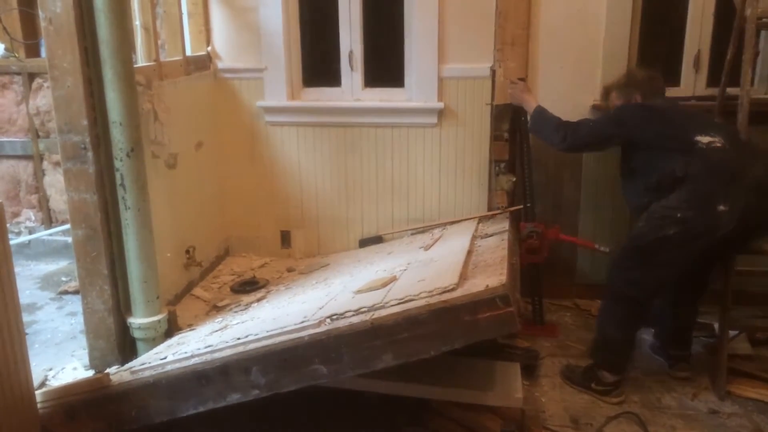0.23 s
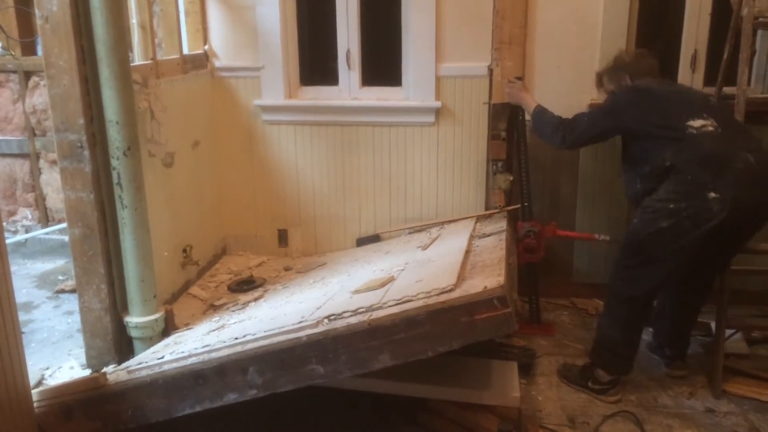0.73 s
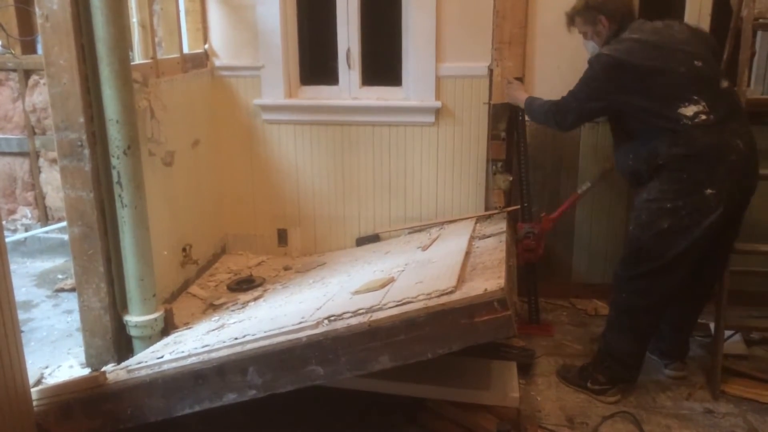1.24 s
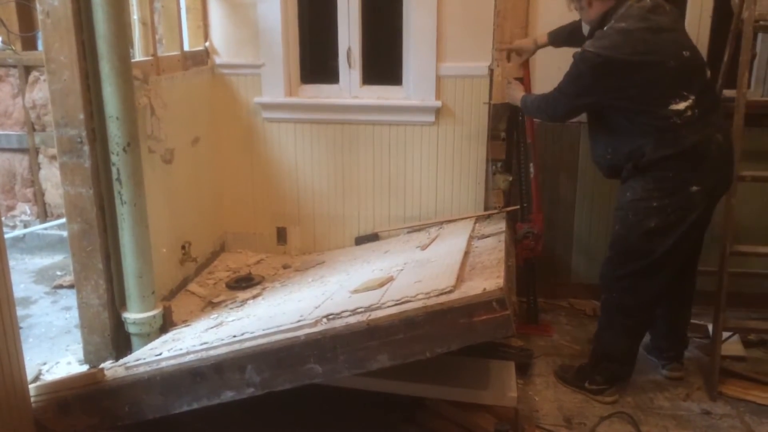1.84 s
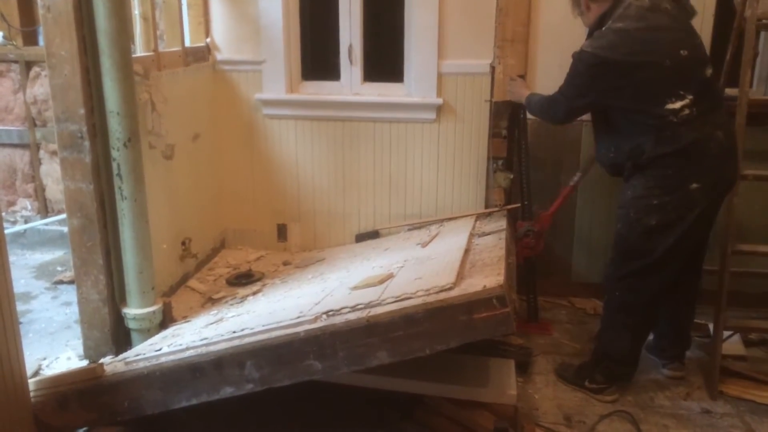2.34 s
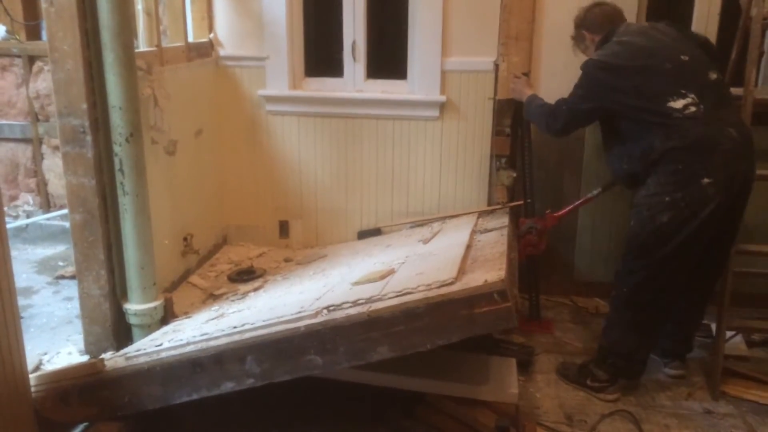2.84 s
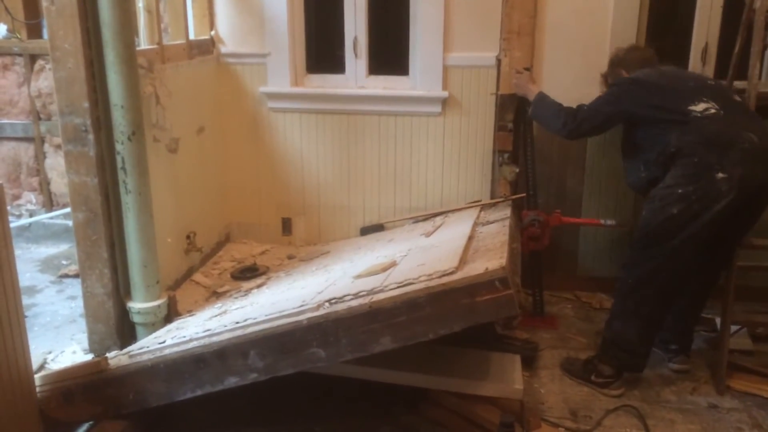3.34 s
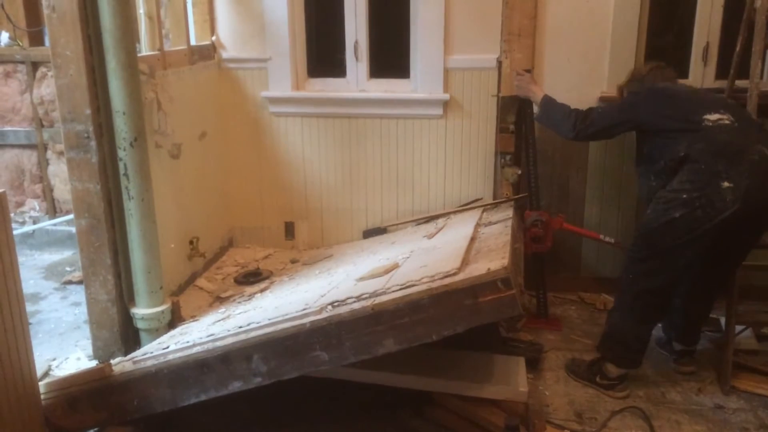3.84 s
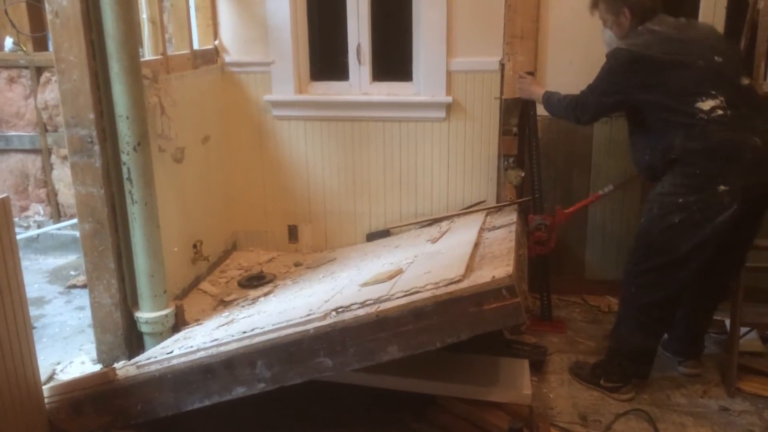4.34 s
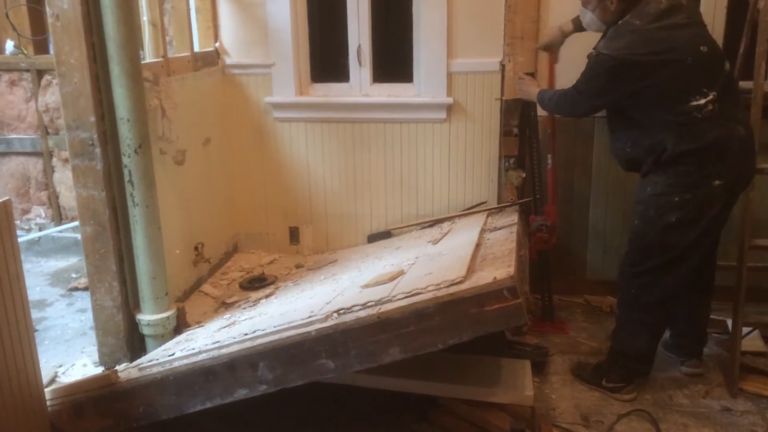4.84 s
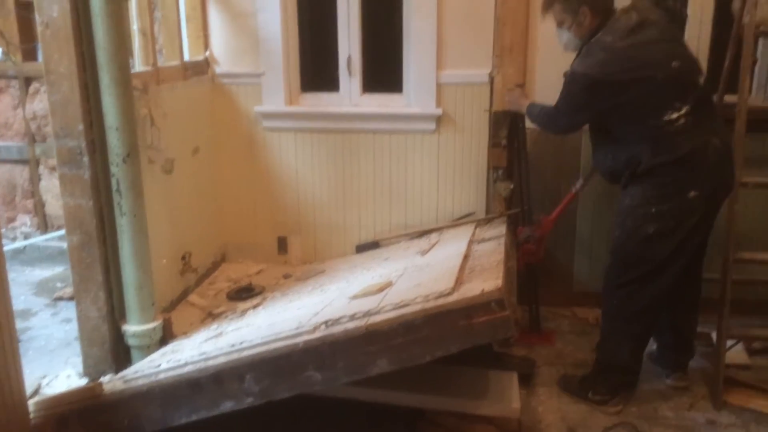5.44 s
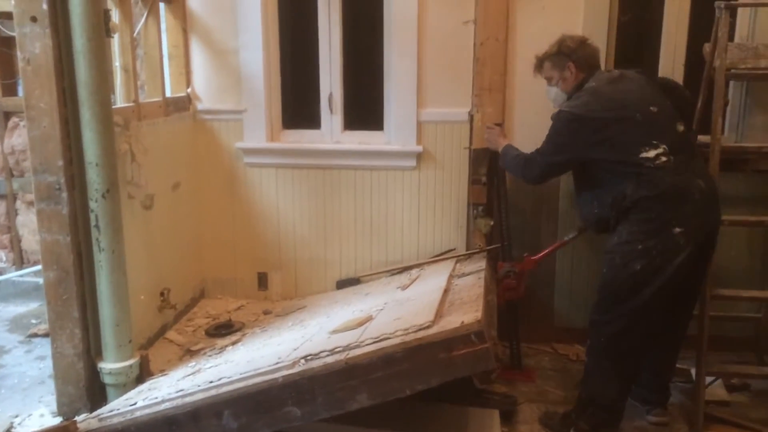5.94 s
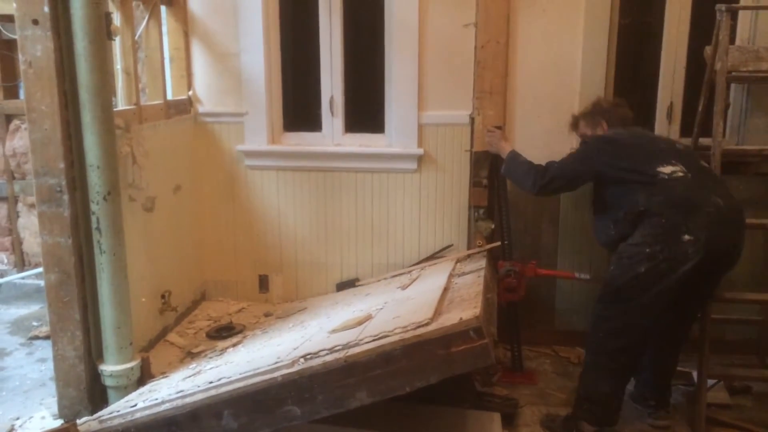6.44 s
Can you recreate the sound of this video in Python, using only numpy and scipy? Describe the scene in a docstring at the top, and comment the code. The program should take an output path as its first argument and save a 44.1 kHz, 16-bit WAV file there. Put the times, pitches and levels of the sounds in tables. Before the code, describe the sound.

Heavy timber creaks and cracks in three bursts as a hand jack lifts it, steel pins clinking and clanking between strokes.

```python
"""Loaded timber creaks and cracks as a farm jack levers up a heavy wooden floor section in a bare room. On each
down stroke the wood sticks and slips in runs of sharp cracks, which drive the modes of boards and joists so
that the whole floor booms. On each up stroke two steel climbing pins snap over, a clink and then a clank. Boots
shuffle in between, boards thump and the linkage ticks, over faint background noise."""
import sys
import numpy as np
from scipy import signal
from scipy.fft import rfft, irfft
from scipy.io import wavfile
from scipy.ndimage import uniform_filter1d

SR = 44100
rng = np.random.default_rng(int(sys.argv[2]) if len(sys.argv) > 2 else 0)


def put_to_file(sound):
    """Save the sound as 16-bit audio at rate SR, in the file named by the first command-line argument."""
    columns = np.atleast_2d(sound).T  # one column per channel
    safe = np.clip(columns, -1, 1)
    whole_steps = np.round(safe * 32767)
    wavfile.write(sys.argv[1], SR, whole_steps.astype(np.int16))


N = 294588
TIME = np.arange(N) / SR

# the light pin springs into its hole: start_s, level_db, rebound_delay_s, rebound_db
PIN_CLINKS = [(1.5523, -21.5, .010, 2), (4.742, -20, .010, -1)]
# heavy steps and settling timber flex one board each: start_s, level_db, pitch_hz, decay_s
BOARD_BLOWS = [(.348, -31.5, 338, 0.013), (.832, -39.5, 332, 0.014), (.922, -29, 242, .042),
               (.957, -25, 123.3, .034), (1.309, -40.5, 348, 0.03), (2.085, -42, 520, 0.017),
               (2.33, -40, 195, 0.041), (2.515, -41, 158, 0.024), (2.935, -25.5, 232.4, 0.04),
               (2.945, -28.5, 329, .039), (5.366, -40.5, 149, 0.018), (5.595, -50, 267, 0.014),
               (6.332, -24, 318, 0.0075)]


def amp(db):
    """Converts decibels to an amplitude ratio."""
    return 10 ** (np.asarray(db) / 20)


def unit_rms(x):
    """Normalises power to rms 1."""
    return x / np.sqrt(np.mean(x ** 2) + 1e-20)


def unit_blow(x):
    """Normalises energy to that of 10 ms at rms 1."""
    return x / np.sqrt(np.sum(x ** 2) / (SR / 100) + 1e-20)


def curve_at(points, hz):
    """Interpolates on a log-frequency axis."""
    freqs, values = np.transpose(points)
    return np.interp(np.log(hz + 1), np.log(freqs + 1), values)


def add(mix, start, sound):
    """Superposition: a sound joins the mix at its start time in seconds."""
    part = mix[max(round(start * SR), 0):][:len(sound)]
    part += sound[:len(part)]


def colour(x, spectrum, size=4096):
    """Minimum-phase filtering: a causal response with the given magnitude spectrum."""
    log_gain = np.log(amp(curve_at(spectrum, abs(np.fft.fftfreq(size, 1 / SR)))))
    taps = np.fft.ifft(np.exp(np.conj(signal.hilbert(log_gain)))).real
    return signal.oaconvolve(x, taps[:size // 2])[:len(x)]


def burst(spectrum, rise, decay, spread_db=4):
    """Contact noise: a swarm of tiny, uneven impacts builds up and dies away."""
    t = TIME[:int((8 * decay + .04) * SR)]
    noise, size = rng.standard_normal((2, len(t)))
    envelope = np.minimum(t / rise, 1) ** 2 * np.exp(-np.maximum(t - rise, 0) / decay)
    return unit_blow(colour(noise * amp(spread_db * size) * envelope, spectrum))


def clatter(modes, rise, decay):
    """Forced vibration: each damped resonance is a band of noise that follows the contact force."""
    t = TIME[:SR // 8]
    hz = np.fft.rfftfreq(len(t), 1 / SR)
    contact = np.minimum(t / rise, 1) * np.exp(-t / decay)
    out = 0
    for centre, width, db in modes:
        band = 1 / (1 + (2 * (hz - centre) / width) ** 4)
        shaken = irfft(rfft(rng.standard_normal(len(t))) * band, len(t))
        out = out + amp(db) * unit_blow(shaken * contact)
    return unit_blow(out)


def struck(modes):
    """Free vibration: after one kick each mode decays exponentially."""
    t = TIME[:SR // 2]
    ring = sum(amp(db - 60 * t / t60) * np.cos(2 * np.pi * hz * t) for hz, db, t60 in modes)
    return unit_blow(ring * np.minimum(t / .0005, 1))


def slips(rate_hz, spread_db):
    """Stick-slip friction: uneven impulses at a wandering rate, with mean power 1."""
    wander = unit_rms(uniform_filter1d(rng.standard_normal(N), SR // 80))
    speed = rate_hz * np.exp(.5 * wander)
    hits = np.diff(np.floor(np.cumsum(speed) / SR), prepend=0)
    return unit_rms(hits * amp(spread_db * rng.standard_normal(N)))


def strain():
    """Creep under load: the gains of the timber's creak and the floor's groan over time."""
    # fine slipping, one curve per down stroke: time_s, creak_db, groan_db
    strokes = [
        [(0.0, -17, -23), (0.062, -38, -23), (0.084, -29.5, -32), (0.158, -29, -25), (0.332, -33, -24.5),
         (0.36, -32, -19), (0.528, -35, -33.5), (0.606, -53, -52), (0.8, -42, -52)],
        [(2.93, -49, -28), (3.108, -27.5, -23), (3.17, -28, -26), (3.616, -31, -26), (3.94, -38, -45),
         (3.966, -33, -35), (4.048, -38, -51), (4.078, -31, -36.5), (4.3, -58, -48)],
        [(6.06, -33, -36), (6.11, -49, -24), (6.246, -24, -22), (6.274, -28, -27.5), (6.374, -30, -19),
         (6.432, -30, -30), (6.506, -32, -26), (6.534, -27, -31.5), (6.66, -37, -25.5)],
    ]
    creak, groan = np.zeros((2, N))
    for stroke in strokes:
        times, creak_db, groan_db = np.transpose(stroke)
        creak += amp(np.interp(TIME, times, creak_db, left=-120, right=-120))
        groan += amp(np.interp(TIME, times, groan_db, left=-120, right=-120))
    return creak, groan


def cracks(easing=0.55):
    """Stress relief: timber gives way in runs of evenly spaced cracks (start_s, snap_db, wood_db)."""
    # runs of cracks: start_s, count, gap_s, first_snap_db, snap_change_db, wood_db
    runs = [(0.0014, 3, .019, -13.5, 0.5, -26.5), (0.1369, 3, .02, -8, -9, -27.5),
            (0.2683, 2, .0245, -8.5, -7, -25.5), (0.3818, 2, 0.036, -8, -7.5, -22.5),
            (2.9252, 2, .0222, -4.5, 0, -21), (2.9686, 3, .0203, -5, -5.5, -20),
            (3.043, 1, 0, -7.5, 0, -19), (3.079, 4, 0.021, -8, -8, -22.5),
            (3.1765, 2, .031, -15.5, 0.5, -30), (3.2331, 3, .0208, -13.5, -3.5, -26.5),
            (3.3089, 1, 0, -19.5, 0, -24.5), (3.474, 6, 0.036, -10.5, -12.5, -26.5),
            (6.0873, 2, .058, -9.5, -6, -15.5), (6.1726, 3, 0.034, -5, -6.5, -18.5),
            (6.2968, 3, 0.033, -5, -3.5, -22.5), (6.4479, 3, 0.022, -9.5, -2.5, -22.5),
            (6.543, 1, 0, -11.5, 2, -23.5), (6.5757, 3, .0358, -9.5, -3.5, -22)]
    return [(start + k * gap, snap + change * (k / max(count - 1, 1)) ** easing, wood)
            for start, count, gap, snap, change, wood in runs for k in range(round(count))]


def room(x, wet_db, tails=3):
    """Reverberation: early reflections, then diffuse tails that crossfade as if the sources moved."""
    # reflections from the floor and near walls: delay_s, level_db
    echoes = [(.0045, -21), (0.01, -21.5), (0.013, -31.5), (.032, -17.5)]
    # reverberation time: frequency_hz, t60_s
    decay_times = [(100, 0.69), (260, 0.46), (700, 0.45), (1840, 0.41), (4850, 0.39), (9000, 0.28),
                   (15000, 0.2)]
    # spectrum of the diffuse field: frequency_hz, level_db
    diffuse_spectrum = [(100, 5.5), (500, 2), (1500, 1), (3000, -0.5), (6000, -3.5), (15000, -2.5)]
    out = x.copy()
    for delay, db in echoes:
        add(out, delay, amp(db) * x)
    for k in range(tails):
        hz, t, noise = signal.stft(rng.standard_normal(SR * 3 // 4), SR, nperseg=256)
        t60 = curve_at(decay_times, hz)[:, None]
        envelope = amp(curve_at(diffuse_spectrum, hz)[:, None] - 60 * t / t60)
        energy_norm = np.sqrt(2 * np.log(1000) / (t60 * SR))
        tail = signal.istft(noise * envelope * energy_norm, SR, nperseg=256)[1]
        share = np.sqrt(2 / tails) * np.cos(np.pi * (4 * TIME + k / tails))
        add(out, .005, amp(wet_db) * signal.fftconvolve(x * share, tail)[:N])
    return out


def air(level_db=-55.5):
    """Ambient noise: a steady random pressure, strongest in the bass."""
    # faint background noise: frequency_hz, level_db
    spectrum = [(12, -23), (20, -2), (113, 3), (607, -9), (949, -4), (1480, -11.5), (1910, -12),
                (2200, -13.5), (2990, -21), (4300, -21.5), (8410, -26.5), (14700, -31), (16000, -20)]
    return amp(level_db) * unit_rms(colour(rng.standard_normal(N), spectrum))


def ticks(tick_db=-15, grit_per_s=6, grit_db=-43, grit_spread_db=3.5):
    """Light impacts: brief contacts of the linkage and of randomly falling grit give broad spectra."""
    # contacts of the linkage: start_s, level_db
    linkage = [(0.615, -33.5), (0.8629, -38), (1.0618, -35), (1.3912, -36.5), (1.8246, -38),
               (1.8385, -31.5), (2.5032, -37), (2.7904, -36), (2.9035, -21.5), (4.4652, -29.5),
               (4.588, -35.5), (4.8715, -26), (5.4066, -39), (6.0103, -28.5)]
    # one tick: frequency_hz, level_db
    spectrum = [(200, -1.0), (1000, 3.0), (3500, -3.5), (9000, -5.5), (16000, -13)]
    out = np.zeros(N)
    times = TIME[rng.random(N) < grit_per_s / SR]
    grit = zip(times, grit_db + grit_spread_db * rng.standard_normal(len(times)))
    for start, db in list(linkage) + list(grit):
        add(out, start, amp(db + tick_db) * burst(spectrum, rise=0.00097, decay=0.0056))
    return out


def shuffling(thud_db=-6, thud_lag_s=0.01212, step_db=-8):
    """Sliding friction and soft impact: boots scrape and the boards thud; heavy blows thud as well."""
    # boots and loose boards shuffle: start_s, level_db, thud_decay_s
    scuffs = [(.65, -40, .028), (0.809, -36.5, 0.031), (1.02, -43, 0.035), (1.19, -41.5, 0.042),
              (2.08, -40, 0.016), (2.243, -33.5, 0.036), (2.47, -41, 0.013), (2.505, -41.5, 0.01),
              (2.787, -48, 0.0062), (4.165, -39.5, 0.039), (4.374, -39, 0.01), (4.463, -38.5, .01),
              (5.35, -31, .022), (5.551, -37, .015), (5.585, -40.5, .014), (6.06, -36, 0.02)]
    # dull scrape and the thud beneath it: frequency_hz, level_db
    scrape = [(100, -2), (400, 6.5), (900, 8), (1400, 1.5), (2200, -13.5), (4000, -24), (9000, -28),
              (16000, -58)]
    thud = [(30, -8), (80, -12), (135, 3.5), (240, -8.5), (380, 0.5), (600, -26.5), (2000, -68)]
    out = np.zeros(N)
    for start, db, decay in scuffs:
        add(out, start, amp(db) * burst(scrape, rise=0.0059, decay=2 * decay))
        add(out, start + thud_lag_s, amp(db + thud_db) * burst(thud, rise=.01, decay=decay))
    for start, db, _, decay in BOARD_BLOWS:
        add(out, start, amp(db + step_db) * burst(thud, rise=.01, decay=decay))
    return out


def board_thumps(thump_db=5):
    """Damped oscillation: a board bends under a soft, heavy blow and swings a few times."""
    t, out = TIME[:SR // 3], np.zeros(N)
    for start, db, hz, decay in BOARD_BLOWS:
        envelope = (1 - np.exp(-t / 0.0071)) ** 2 * np.exp(-t / decay)
        add(out, start, amp(db + thump_db) * unit_blow(envelope * np.sin(2 * np.pi * hz * t)))
    return out


def pins(clink_db=-4, clank_db=-3, graze_db=-18):
    """Impact and rebound: spring-loaded pins hit the steel bar twice, damped by their tight fit."""
    # loaded pin and handle hit the bar: start_s, level_db, rebound_delay_s, rebound_db, ring_db
    clanks = [(1.924, -18.5, .016, -12.5, -5.5), (5.044, -21.5, .004, 6, -0.5)]
    # contact noise of the light and the loaded pin: frequency_hz, level_db
    clink_noise = [(60, -17), (150, 1), (350, -8), (750, 1), (1400, -1.5), (2800, -8.5), (5000, 1.5),
                   (7000, 0.5), (9700, -5), (12500, -7), (16000, -24)]
    clank_noise = [(35, -22.5), (65, -10.5), (110, -14), (220, -8), (400, -7.5), (600, -6), (950, 3),
                   (1400, 0.5), (1900, -6.5), (2400, -7), (4000, -9), (7200, -14), (9500, -12.5),
                   (12000, -21), (16000, -41)]
    # steel resonances of the two pins and the bar: centre_hz, width_hz, level_db
    clink_modes = [(4350, 350, -8.5), (5930, 310, -2.5), (6250, 370, -13), (8270, 320, -12.5),
                   (8700, 150, -10.5), (10550, 250, -19), (11720, 300, -10.5), (12370, 200, -17.5),
                   (14200, 480, -19)]
    clank_modes = [(3280, 350, -5), (4160, 440, -9), (5440, 130, -11), (6540, 150, -8), (8220, 320, -2),
                   (8540, 130, -4), (9570, 120, -10), (9350, 75, -10.5), (9900, 140, -8),
                   (10270, 120, -12.5), (11100, 186, -14.5), (13030, 240, -16)]
    bar_modes = [(110, 84, -6.5), (282, 27, -11), (383, 57, -4), (404, 87, -2.5), (630, 100, -8.5),
                 (800, 89, -6.5), (889, 88, 0), (966, 86, 0), (1042, 85, -13), (1215, 110, -5.5),
                 (1370, 130, -5.5), (1590, 85, -18.5)]
    out = np.zeros(N)
    for start, db, delay, rebound_db in PIN_CLINKS:
        for at, level in ((start, db), (start + delay, db + rebound_db)):
            gain = amp(level + clink_db)
            add(out, at, gain * burst(clink_noise, rise=0.00075, decay=0.0042))
            add(out, at, gain * clatter(clink_modes, rise=0.001, decay=0.0069))
    for start, db, delay, rebound_db, ring_db in clanks:
        # the pin grazes the lip of its hole just before it lands
        add(out, start - .004, amp(db + graze_db) * burst(clank_noise, rise=0.0017, decay=0.0069))
        for at, level in ((start, db), (start + delay, db + rebound_db)):
            gain = amp(level + clank_db)
            add(out, at, gain * burst(clank_noise, rise=0.0021, decay=0.0085))
            add(out, at, gain * amp(ring_db) * clatter(clank_modes, rise=0.0011, decay=0.005))
            add(out, at, gain * clatter(bar_modes, rise=0.0045, decay=0.015))
    return out


def steel_ringing(pin_db=-2, ping_db=-23):
    """Resonance in steel: the light pin rings on once seated, and the jack pings at each crack."""
    # free modes of the light pin: pitch_hz, level_db, t60_s
    pin_modes = [(4377, -14, 0.41), (5916, 2, 0.26), (8242, -12, 0.33), (9049, -15.5, 0.29),
                 (10470, -6, 0.21), (11690, -11, 0.24)]
    # resonances of the loaded jack: centre_hz, width_hz, level_db
    jack_modes = [(5190, 410, -1.5), (5670, 200, -6)]
    out = np.zeros(N)
    for start, db, _, _ in PIN_CLINKS:
        add(out, start, amp(db + pin_db) * struck(pin_modes))
    for start, snap, _ in cracks():
        add(out, start, amp(snap + ping_db) * clatter(jack_modes, rise=0.00088, decay=0.0043))
    return out


def floor_drone(pitch_hz=195.3, wander=0.0148, level_db=-5):
    """Mode locking: steady creep locks to a strong floor mode and keeps it sounding."""
    _, groan = strain()
    drift, swell = (unit_rms(uniform_filter1d(z, SR // 15)) for z in rng.standard_normal((2, N)))
    phase = 2 * np.pi * np.cumsum(pitch_hz * (1 + wander * drift)) / SR
    return amp(level_db) * groan * unit_rms(np.sin(phase) * amp(2 * swell))


def floor_boom(boom_db=-3, groan_db=-7, rumble_db=-8, joist_db=-7, joist_creak_db=-12):
    """Modal response: each crack and slip kicks the floor, so the boards boom and the joists ring."""
    # modes of the floor section and its joists: pitch_hz, level_db, t60_s
    floor_modes = [(84.5, -4.5, 0.39), (119.6, -6, 0.27), (131.7, 0.5, 0.26), (164, -15, 0.22),
                   (197, -1.5, 0.27), (225.5, 3, 0.11), (283, -8, 0.42), (341.8, -4.5, 0.23),
                   (395, -23, 0.16)]
    joist_modes = [(962, -6, 0.1), (1143, -8.5, 0.21), (1179, -3.5, 0.23), (1277, -3, 0.16),
                   (1309, 2.5, 0.18), (1366, 1, 0.1), (1643, 1, 0.12), (1680, -11, 0.19), (1861, -3, 0.17)]
    # rumble of the floor: frequency_hz, level_db
    rumble = [(20, -30), (50, -4.5), (80, 0.5), (100, -9), (130, 10), (250, -7), (450, -16.5),
              (1000, -34.5)]
    creak, groan = strain()
    kicks, knocks = np.zeros((2, N))
    for start, _, wood in cracks():
        add(kicks, start + 0.00395, amp([boom_db]) * np.interp(start, TIME, groan))
        add(knocks, start + 0.00186, amp([wood + joist_db]))
    judder = slips(rate_hz=120, spread_db=-1) * rng.choice([-1, 1], N)
    out = amp(rumble_db) * groan * unit_rms(colour(judder, rumble))
    for modes, blows, creep_gain in ((floor_modes, kicks, amp(groan_db) * groan),
                                     (joist_modes, knocks, amp(joist_creak_db) * creak)):
        response = struck(modes)
        creep = slips(rate_hz=70, spread_db=6.5) * rng.choice([-1, 1], N)
        out += signal.oaconvolve(blows, response)[:N]
        out += creep_gain * unit_rms(signal.oaconvolve(creep, response)[:N])
    return out


def joint_squeak():
    """Dry friction: a joint rubs in one broad resonance, swelling until it slips."""
    # the rubbing joint: start_s, swell_s, centre_hz, width_hz, level_db
    rub = (3.43, .04, 850, 250, -29)
    start, swell, hz, width, db = rub
    out = np.zeros(N)
    add(out, start, amp(db) * clatter([(hz, width, 0)], rise=swell, decay=swell))
    return out


def timber(snap_db=-15, wood_db=-6, creak_db=-4.5, fizz_db=-24, splinter_db=-12, knock_db=-2):
    """Stick-slip in loaded wood: fine slips creak, sudden ones crack, and a shifting load crunches."""
    # the load shifts on the jack: start_s, splinter_db, knock_db, decay_s
    crunches = [(0.0321,-20,-22,0.011), (0.342,-13.5,-13.5,0.006), (0.8857,-35,-38,0.014),
                (0.9059,-24.5,-26,0.006), (3.81,-23,-28.5,0.0048), (3.8282,-15.5,-28,0.013),
                (3.9539,-15.5,-28.5,0.011), (4.005,-22,-42,0.01), (4.0683,-12.5,-18,0.011),
                (6.3358,-11.5,-27,0.0096), (6.5038,-10,-28,0.0058), (6.6679,-7,-10.5,0.011)]
    # bright snap and woody middle of a crack: frequency_hz, level_db
    snap_spectrum = [(300, -48), (1200, -9.5), (2500, 3), (3700, 1), (5300, -0.5), (7000, -2), (10000, -4),
                     (13000, -6), (16000, -21.5)]
    wood_spectrum = [(120, -32), (350, -1.5), (550, -4.5), (800, -2), (1200, -0.5), (1750, -1),
                     (2300, -8.5), (3200, -13), (5000, -17), (12000, -21.5)]
    # splintering and woody knock of a crunch: frequency_hz, level_db
    splinter_spectrum = [(400, -2.5), (1400, -14), (2100, 0), (2900, 2.5), (4500, 1), (7000, -1.5),
                         (11000, -5), (16000, -11.5)]
    knock_spectrum = [(50, -25), (130, -3), (300, -10.5), (430, -0.5), (560, -3.5), (850, 2), (1300, -4),
                      (2000, -2), (3200, -8.5), (8000, -46)]
    grain_decay = np.exp(-TIME[:SR // 20] / 0.0052)
    grain_envelope = signal.oaconvolve(slips(rate_hz=110, spread_db=2), grain_decay)[:N]
    grains = unit_rms(colour(grain_envelope * rng.standard_normal(N), wood_spectrum))
    fizz = unit_rms(colour(rng.standard_normal(N), snap_spectrum))  # fibres rub finely and evenly
    creak, _ = strain()
    out = creak * (amp(creak_db) * grains + amp(fizz_db) * fizz)
    for start, snap, wood in cracks():
        add(out, start, amp(snap + snap_db) * burst(snap_spectrum, rise=0.00095, decay=0.0031))
        add(out, start, amp(wood + wood_db) * burst(wood_spectrum, rise=0.0015, decay=0.0029))
    for start, splinter, knock, decay in crunches:
        add(out, start, amp(splinter + splinter_db) * burst(splinter_spectrum, rise=0.00075, decay=decay))
        add(out, start, amp(knock + knock_db) * burst(knock_spectrum, rise=0.0041, decay=decay))
    return out


def scene():
    """Superposition: timber, pins and steps reverberate; the ringing bodies and the air add directly."""
    background = air()
    wood = room(timber() + joint_squeak(), wet_db=0.5)
    steel_and_steps = room(pins() + shuffling() + ticks(), wet_db=1)
    bodies = floor_boom() + floor_drone() + board_thumps() + steel_ringing()
    return (background + bodies + steel_and_steps + wood)[None]


def record(dry, bass_cut_hz=48, ceiling=.78, band_limit_hz=15620):
    """Band limiting and saturation: the microphone loses deep bass and top treble and rounds peaks."""
    thin = signal.sosfilt(signal.butter(2, bass_cut_hz, "high", fs=SR, output="sos"), dry)
    rounded = thin / (1 + (thin / ceiling) ** 6) ** (1 / 6)
    lowpass = signal.firwin(301, band_limit_hz, window=("kaiser", 9), fs=SR)
    return signal.oaconvolve(rounded, lowpass[None], "same")


dry = scene()
out = record(dry)
put_to_file(out)
```